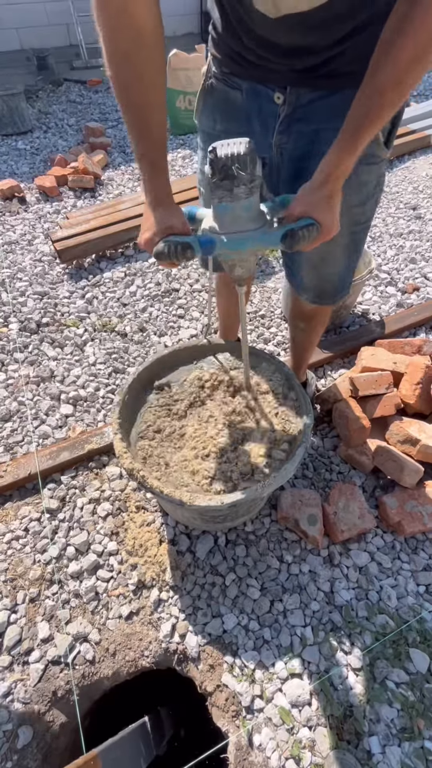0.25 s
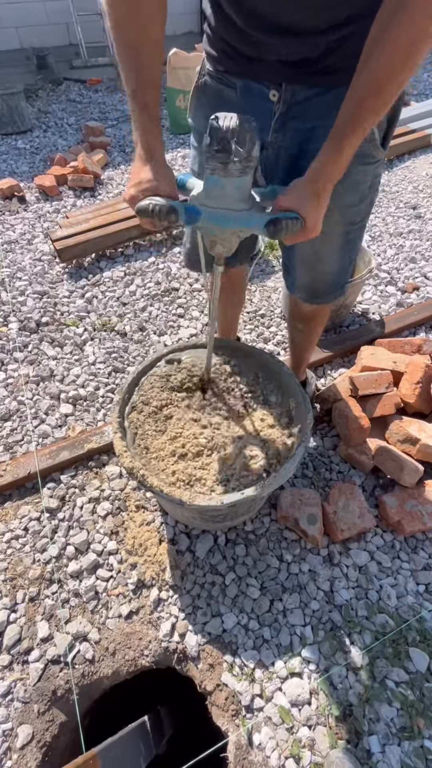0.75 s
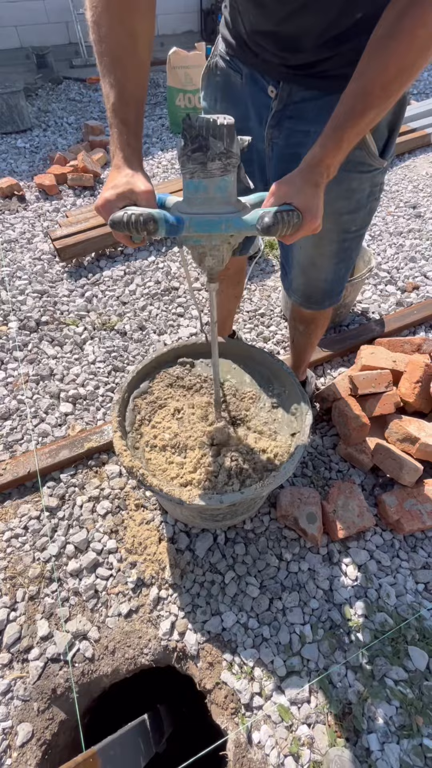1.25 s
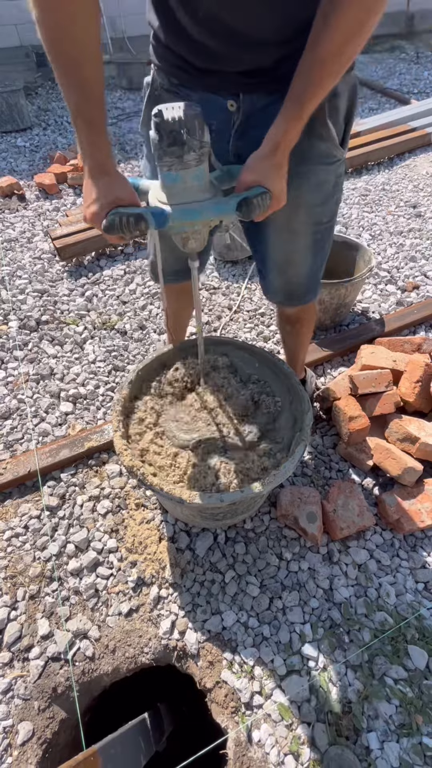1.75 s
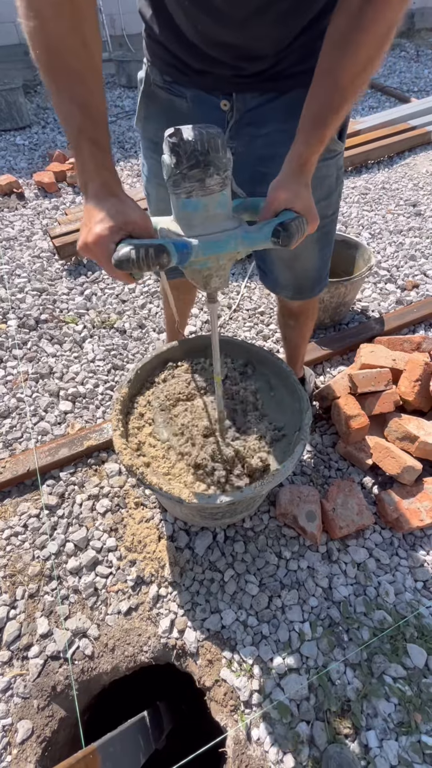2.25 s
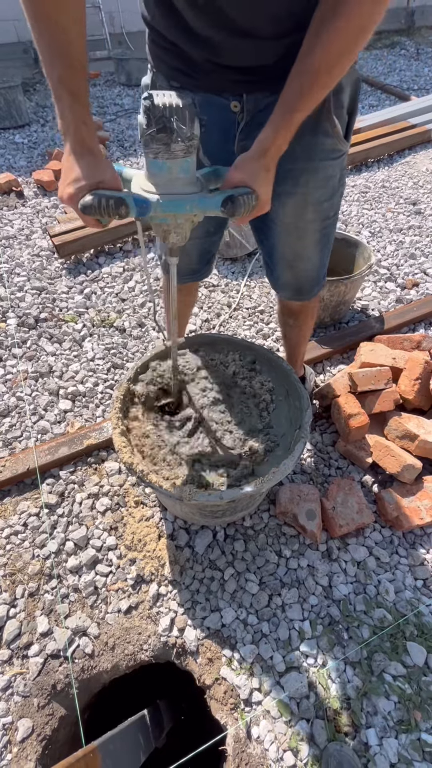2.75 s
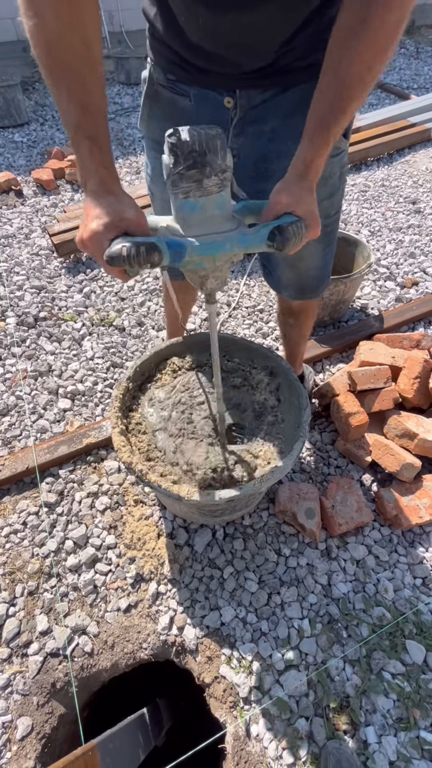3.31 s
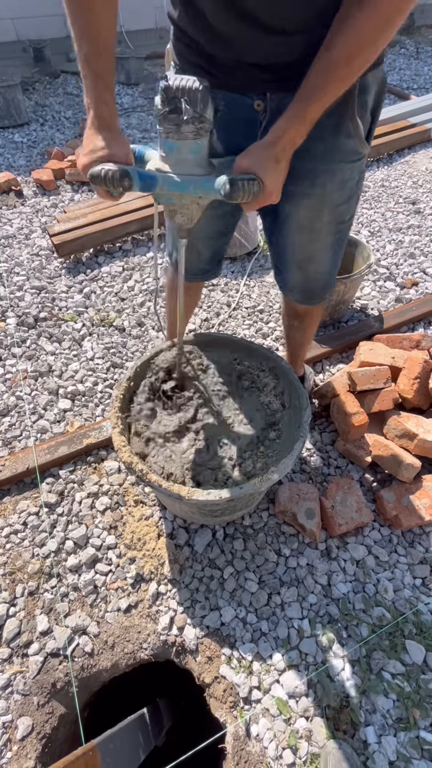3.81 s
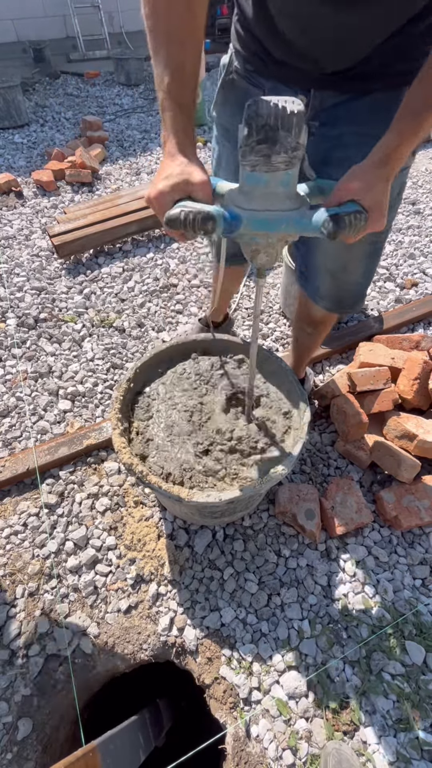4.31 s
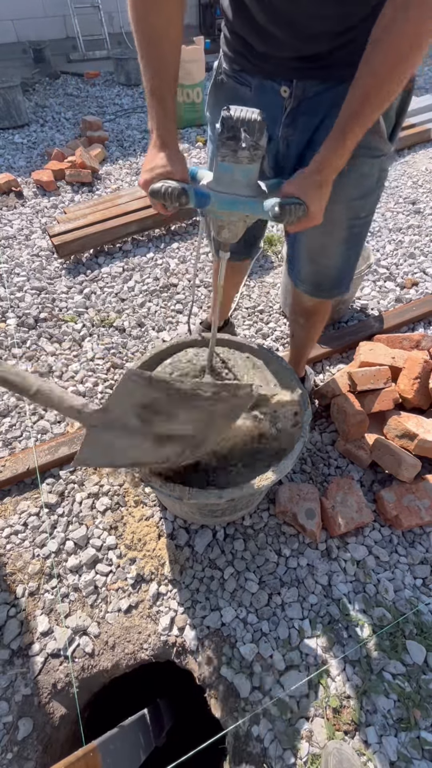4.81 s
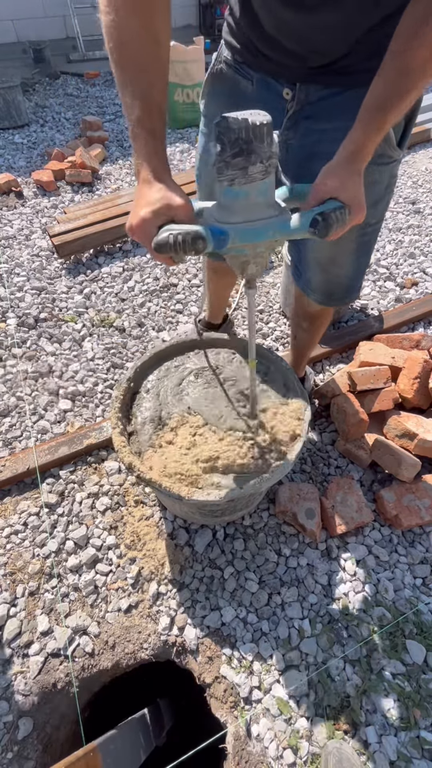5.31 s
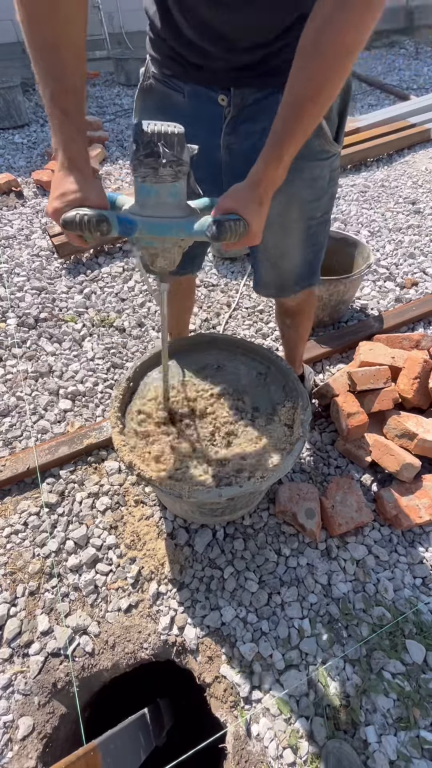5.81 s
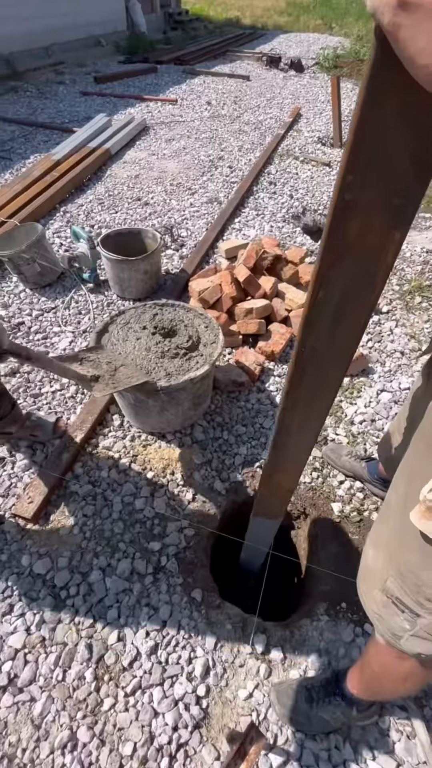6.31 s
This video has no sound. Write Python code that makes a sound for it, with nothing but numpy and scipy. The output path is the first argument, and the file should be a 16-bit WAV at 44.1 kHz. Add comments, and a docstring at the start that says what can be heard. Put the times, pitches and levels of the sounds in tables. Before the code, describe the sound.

From the start, a handheld electric paddle mixer runs close by outdoors, with a high gear whine, an airy hiss and a rattle that swells about once a second. The pitch sags briefly around 0.5 seconds, then recovers and wavers slightly. Underneath, sand and wet cement churn in a plastic tub with hollow slopping, scattered dull paddle knocks and a couple of sharp grit ticks. The churning is fullest from about 2.7 to 4.7 seconds. A faint breeze rumbles on the microphone throughout. Just before 6 seconds the mixer cuts off abruptly, and a few quick gravel crunches follow as a steel shovel drags over stones. At about 6.4 seconds a gust thumps the microphone and the shovel bites into the wet mix with a bright, gritty rasp and several ringing stone clanks, the loudest moment, lasting to the end.

```python
"""On a gravel yard, a handheld paddle mixer stirs sand and cement in a plastic tub. Its gear teeth
whine, its fan hisses, and the mix churns and knocks against the tub, making the plastic ring.
A breeze rumbles on the microphones throughout. Near the end the sound jumps to a later moment:
gravel crunches, a gust thumps, and a steel shovel is driven into the wet mix, where stones rasp
along the blade and make it ring."""
import sys
import numpy as np
from scipy import signal
from scipy.fft import rfft, irfft, next_fast_len
from scipy.io import wavfile
from scipy.ndimage import uniform_filter1d

SR = 44100
rng = np.random.default_rng(int(sys.argv[2]) if len(sys.argv) > 2 else 0)


def int16_out(signal):
    """Quantize to a 16-bit WAV file."""
    q = np.round(np.clip(np.atleast_2d(signal).T, -1, 1) * 32767)
    wavfile.write(sys.argv[1], SR, q.astype(np.int16))


N = 289296
T = np.arange(N) / SR
JUMP_S = 5.957   # the mixer ends and the shovel scene begins
SCUFF_S, TOUCH_S, BITE_S = 6.08, 6.385, 6.408   # the blade drags over stones, touches the mix, digs in


def amp(db):
    """Turn decibels (dB) into a number to multiply by."""
    return 10 ** (np.asarray(db) / 20)


def unit(x):
    """Scale a signal so its average power is 1."""
    return x / np.sqrt(np.mean(x ** 2) + 1e-20)


def curves(rows):
    """Join a table's rows with straight lines in time, one curve for each column after the first."""
    s, *columns = np.transpose(rows)
    return [np.interp(T, s, c) for c in columns]


def swell(s, peak_db, half_s):
    """A smooth bump in power, highest at s seconds."""
    return amp(peak_db) ** 2 * np.exp(-((T - s) / half_s) ** 2)


def fade_in(s, rise_s):
    """Climb from 0 to 1, starting at s seconds."""
    return np.clip((T - s) / rise_s, 0, 1)


def drift(rate):
    """A smooth random wobble of about 1 either way; a higher rate wobbles faster."""
    r = np.exp(-80 * np.pi * rate / SR)
    slow = signal.lfilter([1], [1, -2 * r, r * r], rng.standard_normal(N // 40 + 2002))[2000:]
    return np.interp(np.arange(N) / 40, np.arange(len(slow)), unit(slow))


def grains(per_s, spread_db):
    """Random clicks of uneven size."""
    sizes = amp(spread_db * np.minimum(rng.exponential(1, N), 5)) * rng.choice([-1, 1], N)
    return unit(sizes * (rng.random(N) < per_s / SR) + 1e-9)


def bandpass(x, low_hz, high_hz, order):
    """Keep the sound between two frequencies."""
    return signal.sosfilt(signal.butter(order, [low_hz, high_hz], "band", fs=SR, output="sos"), x)


def resonate(x, modes):
    """Make x ring at each (pitch in Hz, width in Hz, level in dB); narrow ones ring longer."""
    out = 0
    for k, (hz, width, level_db) in enumerate(modes):
        r = np.exp(-np.pi * width / SR)
        feedback = [1, -2 * r * np.cos(2 * np.pi * hz / SR), r * r]
        gain = (1 - r * r) / 2
        out = out + (-1) ** k * amp(level_db) * signal.lfilter([gain, 0, -gain], feedback, x)
    return out


def resonate_twice(x, modes):
    """Two passes leave little but the ringing pitches."""
    return resonate(resonate(x, modes), modes)


def colour(x, spectrum, patchy_db, rate):
    """Let each half octave of a noise flicker, then shape it from bass to treble."""
    out, together = 0, drift(rate)
    edges = 110 * 2 ** np.arange(0, 7.6, .5)
    for k, (low, high) in enumerate(zip(edges, edges[1:])):
        flicker = amp(patchy_db * (0.24 * together + drift(rate)))
        out = out + (-1) ** k * bandpass(x, low, high, order=2) * flicker
    hz, level_db = np.transpose(spectrum)
    f = np.fft.rfftfreq(N, 1 / SR)
    shape = amp(np.interp(np.log(f + 1), np.log(hz), level_db))
    return unit(irfft(rfft(out) * shape, N))


def puffs(events, decay_s):
    """A short burst of noise that swells and dies at every event."""
    out, t = np.zeros(N + SR), np.arange(round(0.037 * SR)) / SR
    shape = np.e * t / decay_s * np.exp(-t / decay_s)
    for s, level_db, *_ in events:
        i = round(s * SR)
        out[i:i + len(t)] += amp(level_db) * rng.standard_normal(len(t)) * shape
    return out[:N]


def blows(events, decay_s, sharpness):
    """Each hit is a burst of noise that rings at its own pitch."""
    out = np.zeros(N)
    for s, level_db, pitch_hz in events:
        i = round(s * SR)
        puff = puffs([(s, 0)], decay_s)[i:i + 4096]
        burst = resonate_twice(puff, [(pitch_hz, pitch_hz / sharpness, 0)])
        out[i:i + 4096] += amp(level_db) * burst / np.abs(burst).max()
    return out


# The motor's speed, heard as the pitch of gear teeth meeting. Each row: time in seconds,
# tooth pitch in Hz, level in dB of the tones about an octave above it.
MOTOR = [(0, 2045, -46.5), (.24, 2030, -46), (.34, 2008, -53), (.48, 1843, -62), (.6, 1900, -49),
         (.69, 1970, -60), (.79, 2017, -42.5), (.93, 2043, -48), (1.04, 2058, -43), (1.28, 2082, -56),
         (1.65, 2085, -49.5), (1.83, 2060, -45), (2.0, 2084, -49), (2.1, 2102, -69), (2.17, 2101, -47),
         (2.32, 2059, -52), (2.47, 2044, -47), (2.51, 2070, -51), (2.72, 2070, -46), (2.87, 2053, -56),
         (2.93, 2037, -48), (3.08, 2050, -45.5), (3.16, 2060, -54), (3.28, 2085, -50), (3.38, 2063, -52),
         (3.55, 1993, -67), (3.68, 2000, -71), (3.71, 2035, -47), (3.96, 2056, -46.5), (4.15, 2020, -52),
         (4.38, 2096, -39.5), (4.5, 2080, -45), (4.7, 2022, -59), (4.76, 2022, -46), (4.93, 2007, -47.5),
         (5.07, 2025, -39), (5.22, 2013, -42.5), (5.36, 2029, -50), (5.41, 2030, -56), (5.5, 2039, -46.5),
         (5.67, 2011, -49), (5.95, 2023, -55)]
# The rattle swells about once a lap round the tub. Each row: time in seconds, peak in dB,
# half length in seconds.
RATTLE_SWELLS = [(0.05, -50, 0.11), (.63, -48.5, 0.13), (1.34, -55, 0.18), (2.3, -47, 0.14),
                 (3.37, -45.5, 0.17), (4.47, -50, 0.2), (5.56, -47, 0.27)]
# The tones in the whine. Each row: vibrations per turn of the big wheel, group (0 below the tooth
# pitch, 1 around it, 2 an octave up, 3 higher), dB added to that group's level.
GEAR_TONES = [(34, 0, 0), (34, 1, -10), (35, 1, -2), (36, 1, -5), (68, 2, -16), (70, 2, 0), (71, 2, -11),
              (105, 3, -2), (140, 3, -6), (210, 3, -1), (245, 3, -9)]


def gear_whine():
    """Meeting teeth make tones; neighbouring tones beat once a turn, which is the rattle."""
    teeth = 35
    tooth_hz, octave_db = curves(MOTOR)
    group_levels = [amp(-61 + 4 * drift(1.47)),
                    np.sqrt(amp(-66) ** 2 + sum(swell(*lap) for lap in RATTLE_SWELLS)),
                    amp(octave_db),
                    amp(-60.5 + drift(6) - 5 * bogging())]
    wheel_angle = 2 * np.pi * np.cumsum(tooth_hz * (1 + .001 * drift(12))) / SR / teeth
    out = 0
    for per_turn, group, level_db in GEAR_TONES:
        rough = min(.25 + per_turn / 500, .6)   # uneven teeth roughen the high tones most
        flutter = np.sqrt(1 - rough ** 2) + rough * drift(150)
        wander_db = (3 if per_turn % teeth else 2) * drift(7)
        tone = np.cos(per_turn * wheel_angle + .4 * drift(8))
        out = out + group_levels[group] * amp(level_db + wander_db) * flutter * tone
    return np.sqrt(2) * out


def bogging(free_hz=1990, slow_hz=1890):
    """How much the motor is bogged down: 0 running freely, 1 at slow_hz or below."""
    return np.clip((free_hz - curves(MOTOR)[0]) / (free_hz - slow_hz), 0, 1)


# The tone of the fan and grit. Each row: frequency in Hz, relative level in dB.
HISS_SPECTRUM = [(150, -13.5), (1000, 2.5), (1750, -4), (2200, 3), (2900, 3), (3600, -1.5), (4800, 3.5),
                 (5900, -3), (6900, -11), (8300, -10), (11000, -16), (13200, -12), (14700, -18.5),
                 (15600, -30)]


def fan_hiss():
    """Air and grit hiss, louder with hard stirring and a little softer when the motor slows."""
    stirring_db = uniform_filter1d(np.maximum(*curves(STIRRING)), round(0.29 * SR))
    level_db = -43 + 0.36 * (stirring_db - stirring_db.mean()) - bogging()
    air = rng.standard_normal(N) + 0.23 * grains(per_s=1500, spread_db=11)
    return amp(level_db) * colour(air, HISS_SPECTRUM, patchy_db=1.5, rate=11.7)


def slosh():
    """Tumbling lumps: clicks and noise that surge unevenly."""
    return amp(2.7 * drift(12)) * (grains(per_s=800, spread_db=3) + rng.standard_normal(N))


# How loud the stirring is. Each row: time in seconds, relative levels in dB of the low and high sounds.
STIRRING = [(0, -59, -55), (.15, -46, -44), (.3, -49, -60), (.7, -57, -52), (.88, -50, -48),
            (1.1, -56, -50.5), (1.4, -51, -39.5), (1.75, -43.5, -50), (2.4, -48, -43), (2.8, -42.5, -38.5),
            (2.86, -40.5, -52), (3.05, -44.5, -50), (3.4, -47.5, -39), (3.62, -48.5, -46.5),
            (3.67, -45.5, -36.5), (3.85, -42, -39.5), (4.05, -39, -46), (4.16, -45, -53),
            (4.4, -42.5, -39.5), (4.66, -44.5, -40.5), (4.75, -52.5, -54), (5.0, -54.5, -58),
            (5.3, -52, -46.5), (5.7, -51.5, -47), (5.95, -59, -49)]
# The tub's low and high ringing. Each row: pitch in Hz, width in Hz, gain in dB on each pass.
TUB_LOW_MODES = [(215, 116, -11), (303, 84, 0), (597, 210, 4.5)]
TUB_HIGH_MODES = [(1230, 400, 4), (1650, 600, 0)]


def churning(lumps):
    """Lumps stir up the tub's low ringing and the paddle's hollow; scraping stirs up the high ringing."""
    low_db, high_db = curves(STIRRING)
    wet_mix = slosh()
    scrape = amp(2.3 * drift(12)) * (0.7 * grains(per_s=1500, spread_db=2.5) + rng.standard_normal(N))
    low = amp(-11.5) * unit(resonate_twice(lumps, TUB_LOW_MODES)) + amp(-3.5) * paddle_hollow(wet_mix)
    high = amp(-7.5) * unit(resonate_twice(scrape, TUB_HIGH_MODES))
    return amp(low_db) * low + amp(high_db) * high


# The hollow behind the paddle. Each row: time in seconds, pitch in Hz, width of its ringing in Hz.
HOLLOW_PITCH = [(0, 500, 400), (.14, 352, 300), (.22, 714, 400), (.75, 407, 350), (1.5, 525.6, 298.5),
                (2.3, 478.4, 300), (2.6, 567.5, 199), (2.85, 763, 498), (3.1, 468.4, 220.3),
                (3.5, 517.7, 260.6), (4.0, 802, 497.4), (4.25, 527, 200), (4.55, 660, 139), (4.7, 524, 140),
                (4.8, 655.3, 402.4), (5.95, 618, 400)]


def paddle_hollow(wet_mix):
    """The hollow behind the paddle opens and closes, so the pitch it rings at wanders."""
    pitch_hz, width_hz = curves(HOLLOW_PITCH)
    pitch_hz = pitch_hz * (1 + 0.059 * drift(4.9))
    out, state = np.zeros(N), np.zeros(2)
    for i in range(0, N, 256):   # retune in short steps
        r = np.exp(-np.pi * width_hz[i] / SR)
        feedback = [1, -2 * r * np.cos(2 * np.pi * pitch_hz[i] / SR), r * r]
        gain = np.sqrt(1 - r * r)
        out[i:i + 256], state = signal.lfilter([gain, 0, -gain], feedback, wet_mix[i:i + 256], zi=state)
    return unit(out)


# The paddle rubbing the tub wall. Each row: time in seconds, level in dB.
WALL_RUB = [(0, -66), (.8, -60), (1.3, -63), (5.1, -67), (5.3, -56), (5.9, -62.5)]


def wall_note(lumps, pitch_hz=335, width_hz=30):
    """The tub wall rings on one note while the paddle rubs it."""
    return amp(curves(WALL_RUB)[0]) * unit(resonate(lumps, [(pitch_hz, width_hz, 0)]))


# The strength of the wind. Each row: time in seconds, level in dB on the right (the left gets 2 dB more).
WIND_LEVELS = [(0, -81), (.35, -65), (1.0, -78.5), (1.69, -65.5), (1.95, -79), (2.55, -84), (2.8, -61),
               (3.1, -61), (3.3, -76), (3.6, -62.5), (4.8, -67), (5.35, -80), (5.47, -60.5), (5.95, -67),
               (5.98, -58), (6.2, -51.5), (6.27, -53), (6.33, -41.5), (6.41, -33), (6.45, -45), (6.5, -39),
               (6.56, -44)]


def breeze(thump_s=6.392, thump_hz=64):
    """Wind pushes unevenly on both microphones; its hardest push is a low thump."""
    shared, left, right = rng.standard_normal((3, N))
    gusts = np.array([left + 1.2 * shared, right + 1.2 * shared]) * amp(4 * drift(10))
    rumble = unit(bandpass(gusts, 40, 95, order=3))
    flutter = unit(bandpass(gusts, 90, 200, order=4))
    wind = amp(curves(WIND_LEVELS)[0]) * unit(rumble + amp(-10.5) * flutter)
    delay_s = np.array([[0], [.0025]])   # the thump reaches the right side later
    phase = 2 * np.pi * thump_hz * (T - thump_s - delay_s)
    thump = np.sqrt(swell(thump_s, -28.5, half_s=.023)) * (np.sin(phase) + .3 * np.sin(2 * phase))
    return amp([[2], [0]]) * (wind + thump)


# Paddle knocks, then grit ticks. Each row: start in seconds, peak level in dB, pitch in Hz.
PADDLE_KNOCKS = [(.144, -43, 317), (.179, -42, 420), (.228, -34, 750), (.874, -45, 501), (1.16, -35, 300),
                 (1.161, -35, 900), (1.459, -39, 500), (1.46, -40, 150), (1.574, -44, 516),
                 (2.723, -35, 696), (2.79, -37, 1644), (2.987, -36, 600), (3.368, -34, 581),
                 (3.659, -44, 1390), (4.262, -39, 510), (5.641, -41, 350)]
GRIT_TICKS = [(0.1935, -33, 5670), (1.8926, -35, 5670)]


def knocks_and_ticks():
    """The paddle knocks and slops in the mix, and flung grit ticks on the wall."""
    knocks = blows(PADDLE_KNOCKS, decay_s=0.0028, sharpness=1.3)
    return knocks + blows(GRIT_TICKS, decay_s=0.004, sharpness=2)


def mixer():
    """The gear whine and, separately, all the mixer's other noises; both stop at the jump."""
    whine, hiss, lumps = gear_whine(), fan_hiss(), slosh()
    noises = hiss + churning(lumps) + wall_note(lumps) + knocks_and_ticks()
    return np.array([whine, noises]) * np.clip((JUMP_S - T) / 0.01, 0, 1)


# The steel blade's ringing. Each row: pitch in Hz, width in Hz, relative level in dB.
BLADE_MODES = [(562, 29, -6.5), (814, 100, 10), (1220, 145, 1.5), (1400, 210, -0.5)]
# The tone of stones rasping on steel. Each row: frequency in Hz, relative level in dB.
RASP_SPECTRUM = [(300, -16), (1000, -4), (1750, -4.5), (2400, -1), (3100, -4), (3700, 1.5), (4800, 1),
                 (6800, -9), (9500, -11), (13200, -15), (15500, -6)]


def blade_scrape(stones, touch):
    """Stones rasp along the blade and set it ringing: faintly at first, loudly as it digs in."""
    scuff = swell(SCUFF_S, 0, half_s=0.034)
    bite = fade_in(BITE_S, rise_s=.022)
    ring_level = amp(-65) + amp(-51) * scuff + amp(-41.5) * touch
    rasp_level = amp(-57.5) + amp(-60) * scuff + amp(-42) * touch + amp(-28) * bite
    ring = amp(2 * drift(30)) * unit(resonate(stones, BLADE_MODES))
    rasp = colour(stones, RASP_SPECTRUM, patchy_db=1.2, rate=30)
    return ring_level * ring + rasp_level * rasp


# Gravel crunches. Each row: start in seconds, relative level in dB, dB added for the bright part.
CRUNCHES = [(5.993, -53, 6.5), (6.033, -39, 1.5), (6.064, -46, -17), (6.122, -37, -13),
            (6.172, -36.5, -7.5), (6.246, -54, -14), (6.283, -42, -4.5)]


def gravel_crunch():
    """Each crunch is a dull ring of the blade plus a bright crackle."""
    dull = resonate(puffs(CRUNCHES, decay_s=0.0022), BLADE_MODES)
    crackle = puffs([(s, level_db + bright_db) for s, level_db, bright_db in CRUNCHES], decay_s=0.0025)
    bright = resonate(crackle, [(2700, 1500, 0), (5500, 4000, -4)])
    return amp(8) * dull + amp(9) * bright


def tub_thud(stones, touch):
    """The tub answers with a low sound as the blade drags, and again once it touches the mix."""
    level = amp(-51) * swell(SCUFF_S, 0, half_s=0.073) + amp(-46) * touch
    return level * unit(resonate_twice(stones, [(186, 130, 1), (333, 290, -2.5)]))


# Stones striking the blade. Each row: start in seconds, peak level in dB, pitch in Hz.
STONE_STRIKES = [(6.387, -44, 895), (6.433, -30, 1420), (6.445, -26, 800), (6.465, -20, 766),
                 (6.512, -24.5, 1410)]


def shovel():
    """After the jump, the shovel scrapes, crunches and thuds, and single stones clank on its blade."""
    touch = fade_in(TOUCH_S, rise_s=.003)
    stones = amp(1.5 * drift(60)) * grains(per_s=3000, spread_db=2.6) + .8 * rng.standard_normal(N)
    digging = blade_scrape(stones, touch) + gravel_crunch() + tub_thud(stones, touch)
    clanks = blows(STONE_STRIKES, decay_s=0.003, sharpness=4)
    return (digging + clanks) * fade_in(JUMP_S, rise_s=0.0034)


# How the left and right channels differ at each frequency in level, phase and likeness.
# Each row: frequency in Hz, how much louder the left is in dB, how far ahead its phase is in radians,
# how alike the two sides are from 0 to 1.
MIXER_STEREO = [(150, 0, 0, .5), (330, 0, .2, .93), (650, 9, .7, .9), (900, 13, 2.2, .5),
                (1150, 8, 4.4, .9), (1750, 7, 5.3, .8), (2450, .5, 3.3, .88), (3000, 0, 4.2, .78),
                (4100, 1, 4.25, .8), (5600, 1, 3.2, .92), (7000, 0, 3.2, .98), (9000, 0, 6.3, .9),
                (11500, 0, 9.6, .99), (13700, 0, 12.6, .95), (15700, 0, 15.7, .97)]
SHOVEL_STEREO = [(150, 0.11, 6.9, .4), (523, 1.4, 6.9, 0.18), (830, 7.8, 7.85, 0.94), (1640, 1.5, 5, 0.74),
                 (2790, 0.36, 9.92, 0.83), (6600, 1.5, 10.05, 0.92), (14600, 0.11, 22.3, 1)]


def stereo(x, table, scattered=True):
    """The right side is x softened and phase-shifted; if scattered, shifting gravel echoes blend in."""
    size = next_fast_len(N + 4096)
    f = np.fft.rfftfreq(size, 1 / SR)
    hz, *columns = np.transpose(table)
    softer_db, lead, alike = [np.interp(f, hz, c) for c in columns]
    alike = np.clip(alike, 0, 1) if scattered else 1
    echoes = rng.standard_normal((2, 1500)) * np.exp(-np.arange(1500) / 400)
    echoes = echoes / np.linalg.norm(echoes, axis=1, keepdims=True)
    sway = 3 * drift(7)   # slides between the two echo patterns
    scatter = (rfft(x * [np.cos(sway), np.sin(sway)], size) * rfft(echoes, size)).sum(axis=0)
    right = alike * np.exp(-1j * lead) * rfft(x, size) + np.sqrt(1 - alike ** 2) * scatter
    return np.array([x, irfft(right * amp(-softer_db), size)[:N]])


def scene():
    """The mixer, then the shovel, each with its own stereo spread, and the breeze throughout."""
    whine, noises = mixer()
    direct = stereo(whine, MIXER_STEREO, scattered=False)   # the gearbox is in plain sight
    return direct + stereo(noises, MIXER_STEREO) + stereo(shovel(), SHOVEL_STEREO) + breeze()


def record(dry):
    """Cut away the very highest treble."""
    cutoff_hz = 15750
    return signal.sosfilt(signal.ellip(12, .3, 75, cutoff_hz, fs=SR, output="sos"), dry)


dry = scene()
out = record(dry)
int16_out(out)
```